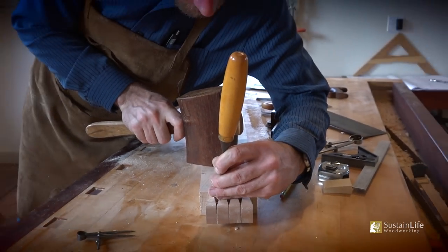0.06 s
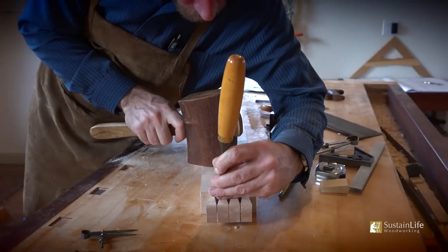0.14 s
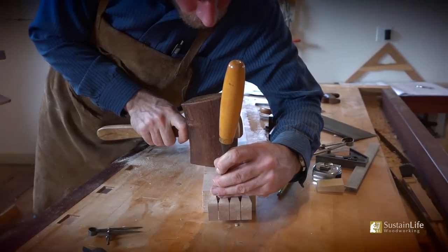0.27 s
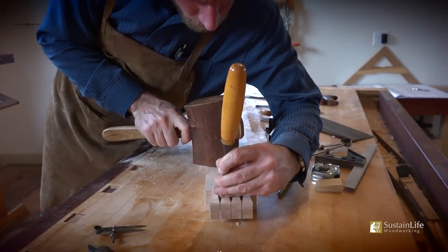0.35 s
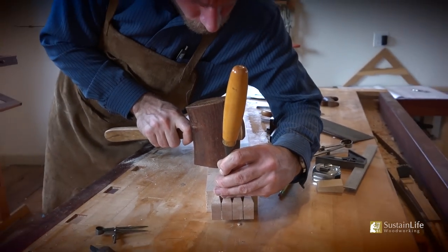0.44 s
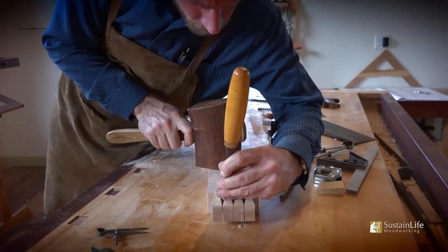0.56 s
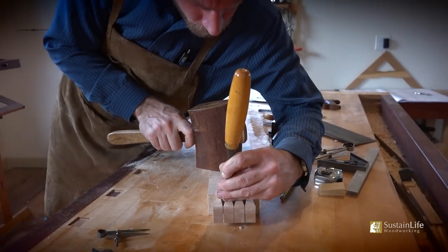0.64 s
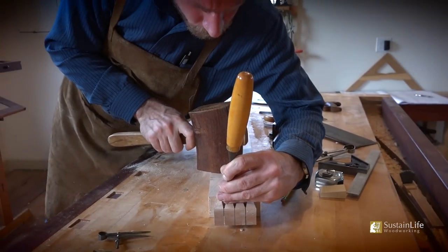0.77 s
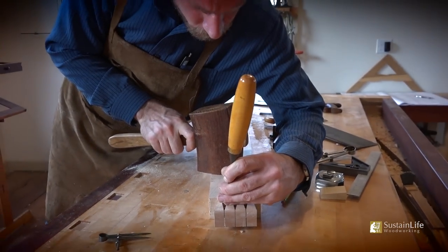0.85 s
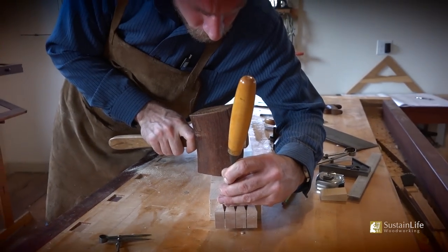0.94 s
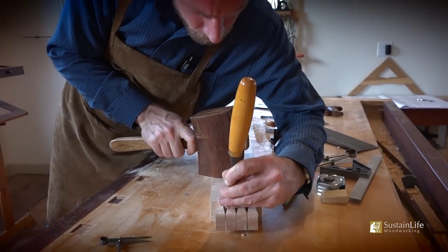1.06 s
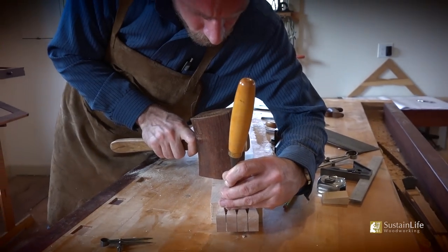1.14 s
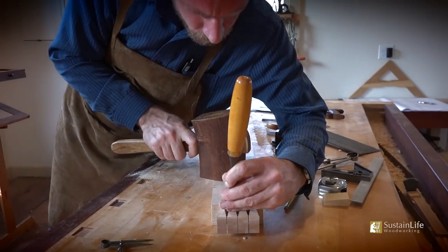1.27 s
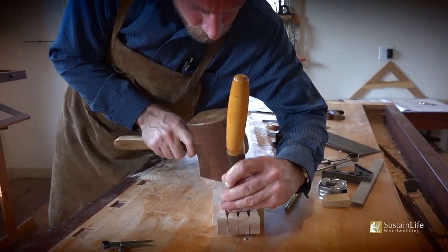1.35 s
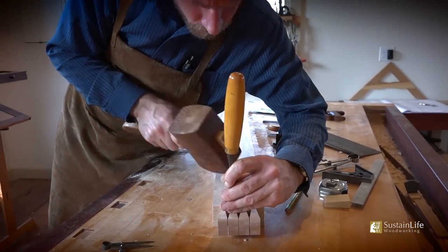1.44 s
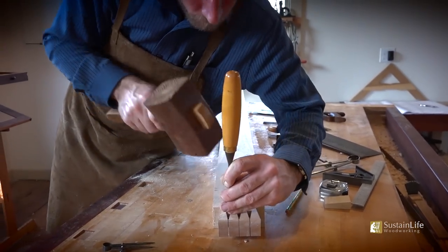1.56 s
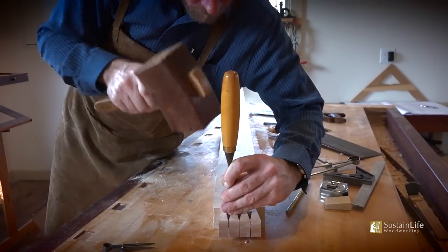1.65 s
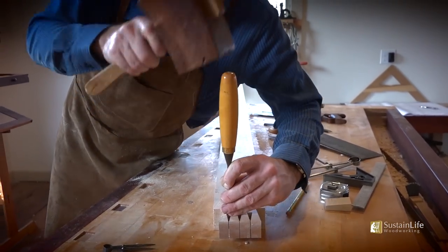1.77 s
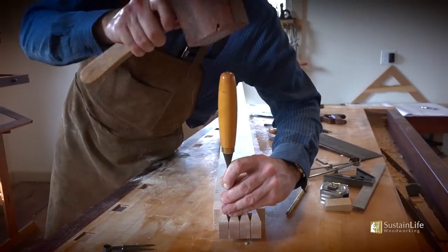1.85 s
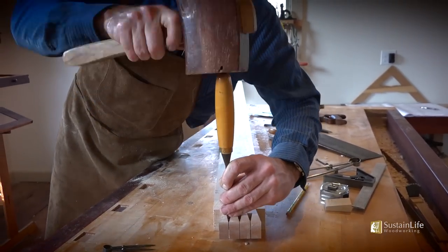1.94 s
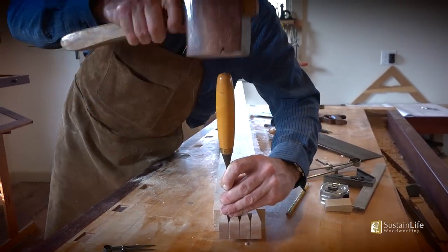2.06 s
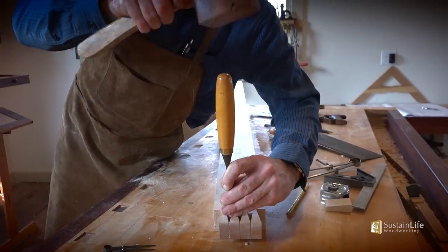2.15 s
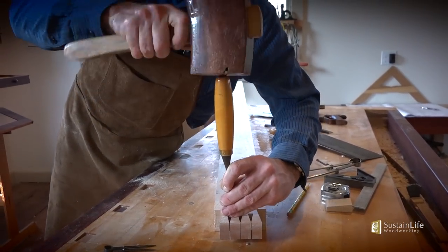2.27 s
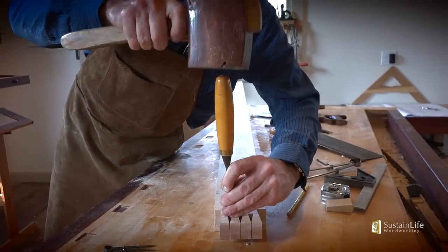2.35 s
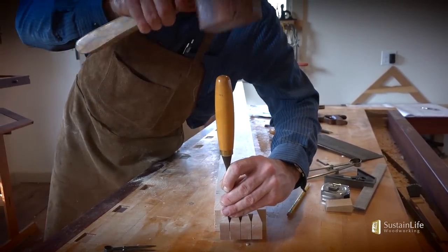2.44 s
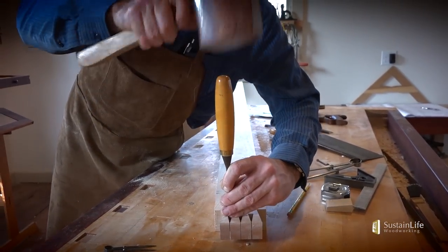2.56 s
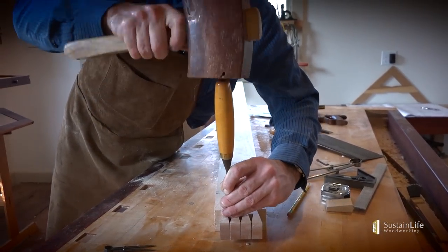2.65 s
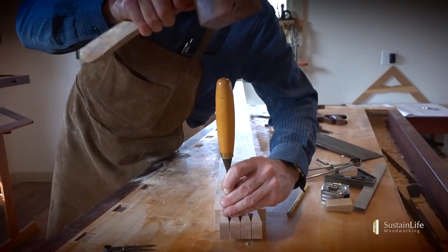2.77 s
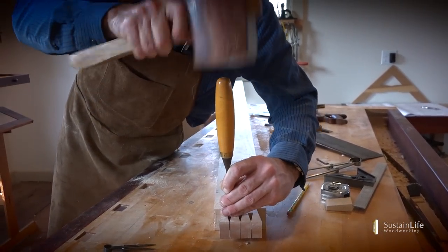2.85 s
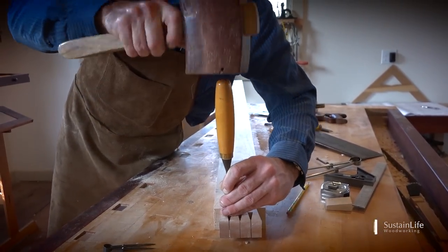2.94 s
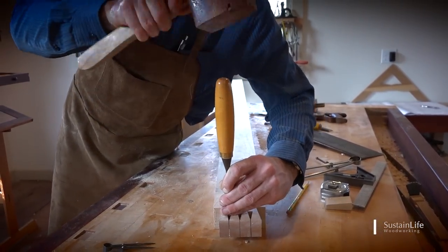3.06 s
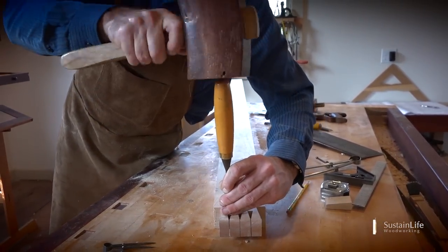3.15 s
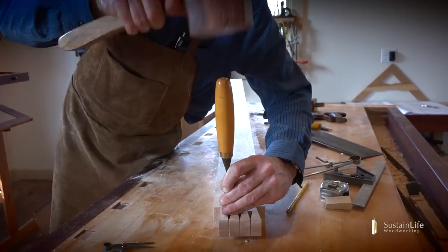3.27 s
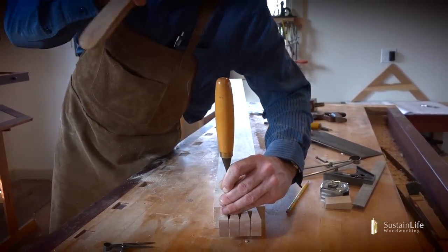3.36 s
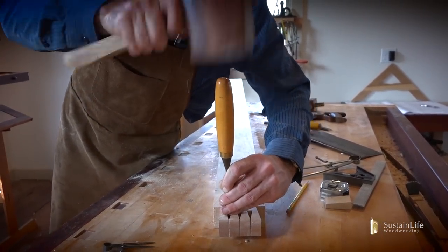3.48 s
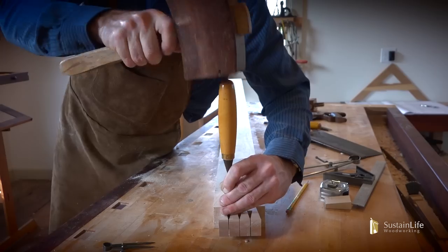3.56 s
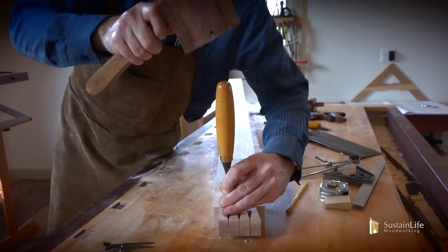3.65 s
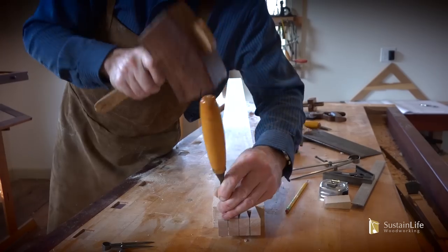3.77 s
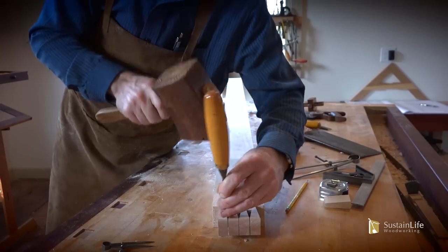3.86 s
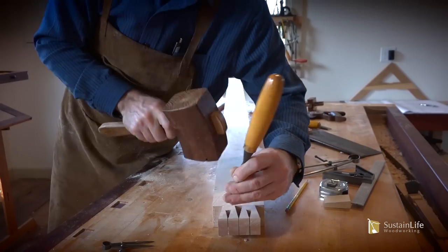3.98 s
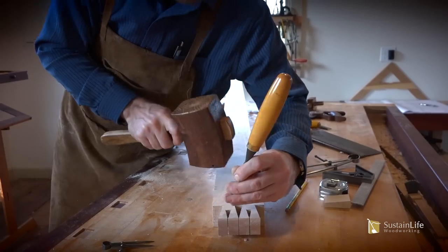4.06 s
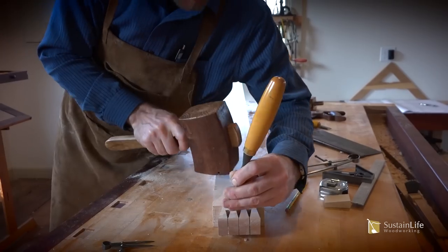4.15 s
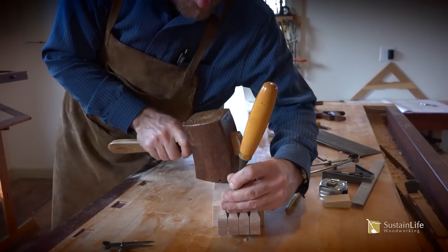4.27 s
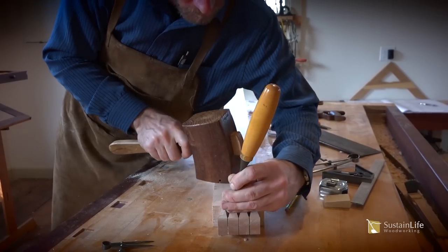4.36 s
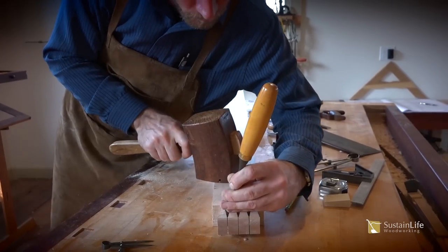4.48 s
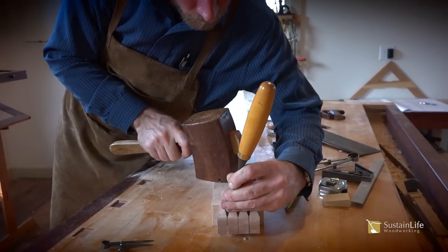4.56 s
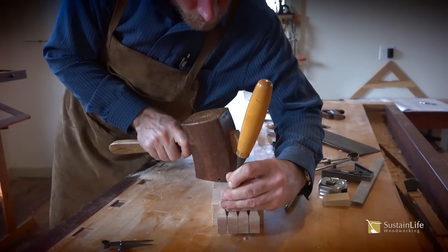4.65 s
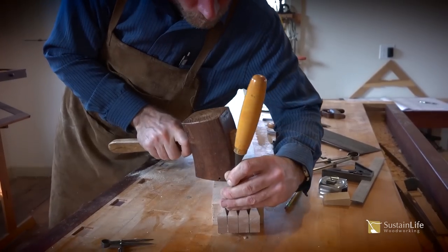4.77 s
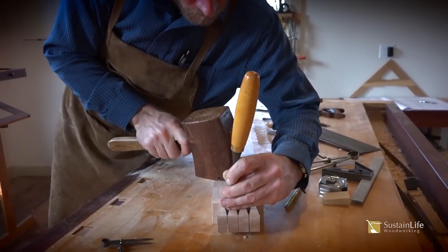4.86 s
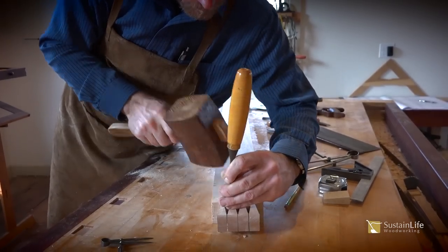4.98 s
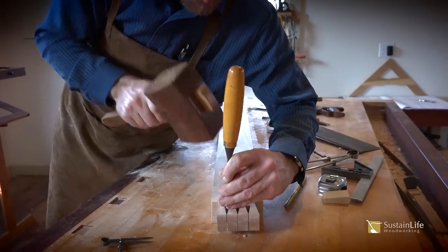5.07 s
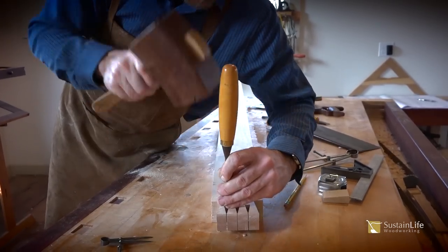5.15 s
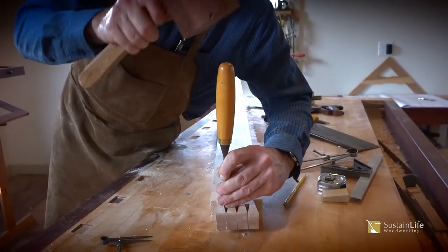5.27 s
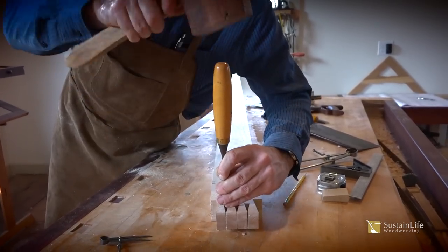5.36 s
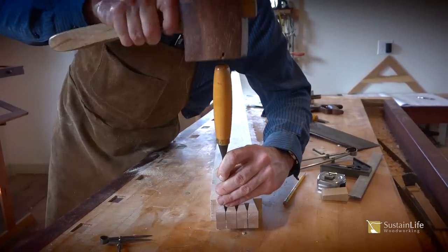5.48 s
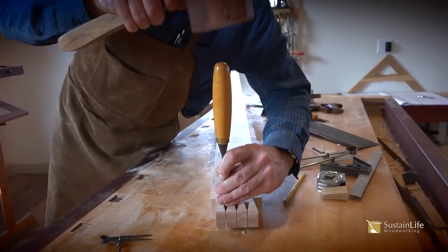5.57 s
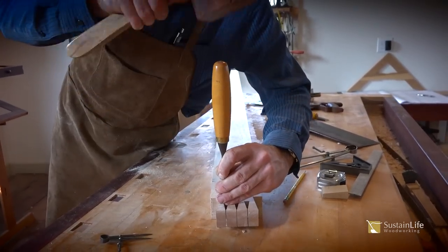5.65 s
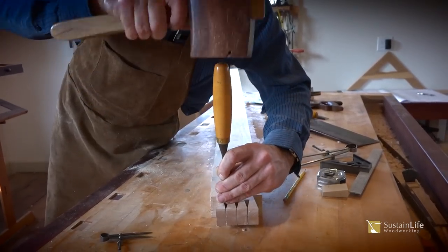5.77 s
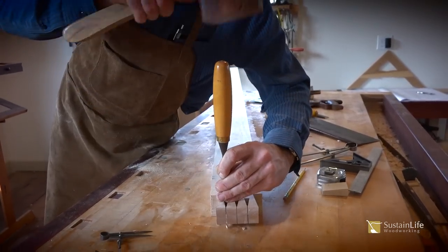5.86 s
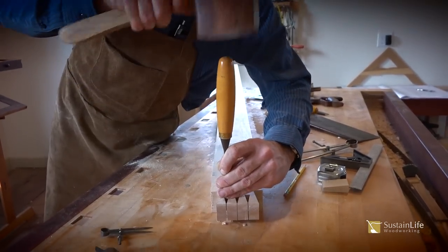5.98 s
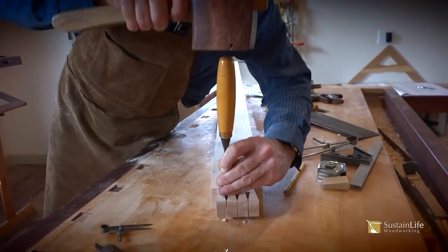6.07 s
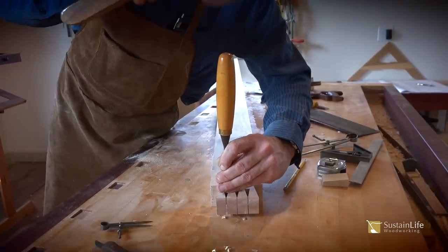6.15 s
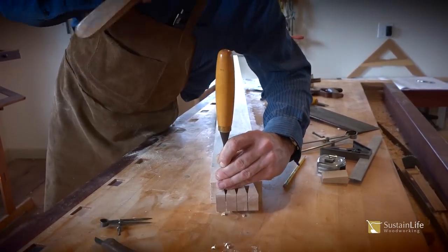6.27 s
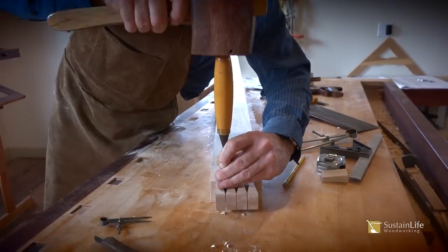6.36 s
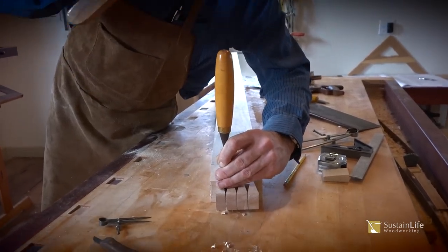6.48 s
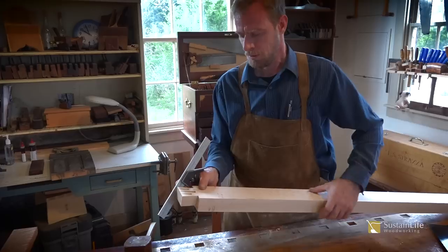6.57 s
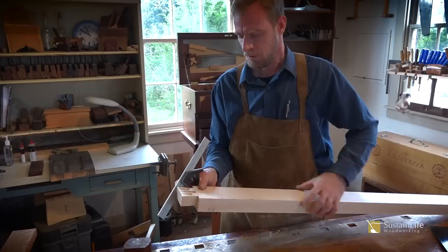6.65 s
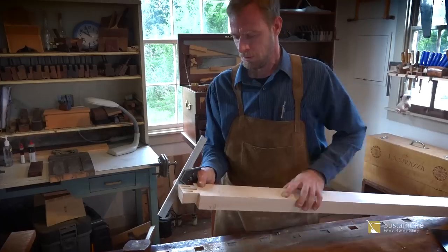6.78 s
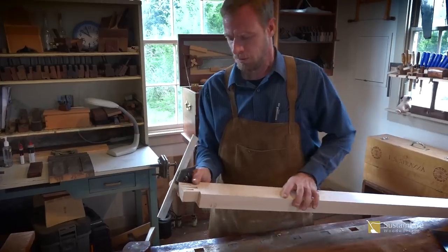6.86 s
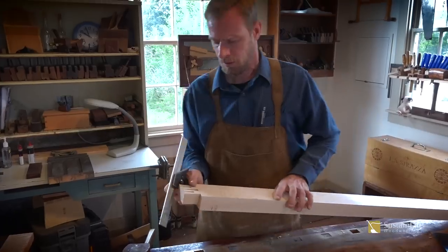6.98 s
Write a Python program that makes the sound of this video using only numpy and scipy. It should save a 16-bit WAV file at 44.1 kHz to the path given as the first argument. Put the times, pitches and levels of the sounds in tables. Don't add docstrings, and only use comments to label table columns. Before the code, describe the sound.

In a quiet, lively workshop with low room tone and a faint fan whine, a small bird whistles quick falling phrases while tools tick. Then six loud mallet blows drive a chisel into wood, about three per second. After a dull bump and a pause, lighter blows grow into four or so hard ones. The scene cuts abruptly to a louder room tone and soft thuds of a shifted board. Close microphone, blows flattened by limiting.

```python
import sys
import numpy as np
from scipy import signal
from scipy.io import wavfile
from scipy.ndimage import uniform_filter1d

SR = 44100
rng = np.random.default_rng(int(sys.argv[2]) if len(sys.argv) > 2 else 0)


def wav_record(signal):
    frames = np.transpose(np.atleast_2d(signal))
    bounded = np.clip(frames, -1, 1)
    quanta = np.round(bounded * 32767).astype(np.int16)
    wavfile.write(sys.argv[1], SR, quanta)


def boost(x):
    u = np.asarray(x, float) / 20
    return 10 ** u


N = 309582
CHANGE_S = 6.597


def evened(x):
    return x / np.sqrt(np.mean(x ** 2) + 1e-20)


def read(points, hz):
    f, value = np.transpose(points)
    return np.interp(np.log(hz + 1), np.log(f + 1), value)


def bell(hz, centre_hz, octaves):
    return np.exp(-(np.log2((hz + 1) / centre_hz) / octaves) ** 2)


def add(mix, s, sound):
    at = round(s * SR)
    sound = sound[..., max(-at, 0):]
    part = mix[..., max(at, 0):][..., :sound.shape[-1]]
    part += sound[..., :part.shape[-1]]


def noise(size, same, db_of, frame=1024, patchy_db=2.0):
    hop = frame // 4
    hz = np.fft.rfftfreq(frame, 1 / SR)[:, None]
    t = np.arange(size // hop + 5) * hop / SR
    a, b, c, d, patches = rng.standard_normal((len(t), len(hz), 5)).T
    patches = uniform_filter1d(patches, size=8, axis=0)
    patches = evened(uniform_filter1d(patches, size=10, axis=1))
    like = np.clip(read(same, hz), -1, 1)
    left = a + 1j * b
    right = like * left + np.sqrt(1 - like ** 2) * (c + 1j * d)
    z = np.array([left, right]) * boost(db_of(hz, t) + patchy_db * patches)
    return signal.istft(z, nperseg=frame, noverlap=frame - hop)[1][:, :size]


def coloured(x, db_of):
    size = x.shape[-1]
    log_gain = np.log(boost(db_of(abs(np.fft.fftfreq(size, 1 / SR)))) + 1e-5)
    response = np.exp(np.conj(signal.hilbert(log_gain)))
    return np.fft.ifft(np.fft.fft(x) * response).real


# f/Hz, t60/s
SHOP = [(60, 0.61), (160, 0.65), (420, 0.46), (1100, 0.49), (2900, 0.53), (7700, 0.45), (12000, 0.33),
        (16000, 0.36)]
# f/Hz, likeness [-1..1]
SAME_SHOP = [(60, 1), (250, 0.98), (1000, 0.99), (3000, 0.99), (5000, 1), (8000, 0.08), (12000, 0.4),
             (16000, 1)]


def room(stretch=1, swell_s=0.0051):
    tail = noise(SR, SAME_SHOP, lambda hz, t: -60 * t / (stretch * read(SHOP, hz)), frame=256, patchy_db=1.2)
    tail = tail * (1 - np.exp(-np.arange(SR) / SR / swell_s))
    return tail / np.linalg.norm(tail[0])


# f/Hz, level/dB per Hz
TONE = [(15, -40), (25, -8.5), (59, -1.5), (200, 0), (335, -10.5), (427, -7), (575, -11.5), (1040, -13.5),
        (2220, -25), (2990, -26.5), (5570, -29.5), (12200, -30.5), (16000, -38.5)]
# f/Hz, width/Hz, level/dB
DRONE = [(86.7, 21, -65), (174, 17, -61.5), (246, 11.5, -63.5), (1060, 110, -65.5)]
# f/Hz, level/dB
RUSTLE = [(500, -3), (1200, 12), (2500, 5.5), (5000, 2), (8000, -0.5), (16000, -72)]
# f/Hz, likeness [-1..1]
SAME_AIR = [(60, .97), (200, 0.92), (600, 0.84), (1600, 0.96), (4500, 0.99), (8000, 0.31), (11000, 0.57),
            (14000, .9)]
# t/s, level/dB
GAIN = [(0, -55.5), (1.95, -53.5), (2.3, -56.5), (4.2, -60), (4.7, -61.5), (5.6, -59.5), (6.59, -60)]
# t/s, level/dB
FAN = [(0, -67), (.6, -65.5), (1.4, -82), (2, -62), (4.7, -65), (5.1, -60.5), (6.59, -63), (7.02, -76)]
# start t/s, length/s, level/dB
RUSTLES = [
    (-.6, 2.26, -66),
    (1.45, 0.27, -67.5),
    (1.5, 0.71, -63),
    (4.85, 1.2, -67.5),
    (6.3, 0.93, -54),
]


def air(whine_hz=424, waver_hz=1.0, new_room_db=-52.5, settle_db=6, settle_s=0.16):
    t = np.arange(N) / SR
    after = t - CHANGE_S
    new_tone_db = new_room_db + settle_db * np.exp(-abs(after) / settle_s)
    tone_db = np.where(after < 0, np.interp(t, *np.transpose(GAIN)), new_tone_db)
    tone = evened(noise(N, SAME_AIR, lambda hz, t: read(TONE, hz), frame=2048))
    for hz0, width, db in DRONE:
        band = noise(N, SAME_AIR, lambda hz, t: -10 * np.log10(1 + (2 * (hz - hz0) / width) ** 4), frame=8192)
        tone = tone + boost(db + 54.0) * evened(band)
    moves = sum(boost(db) * np.sin(np.pi * np.clip((t - s) / length, 0, 1)) for s, length, db in RUSTLES)
    rustle = evened(noise(N, SAME_AIR, lambda hz, t: read(RUSTLE, hz), frame=256, patchy_db=2.5))
    waver = evened(uniform_filter1d(rng.standard_normal(N), size=6000))
    whine = np.sqrt(2) * np.sin(2 * np.pi * np.cumsum(whine_hz + waver_hz * waver) / SR)
    whine_db = np.interp(t, *np.transpose(FAN))
    return boost(tone_db) * tone + moves * rustle + boost(whine_db) * whine


# t/s into phrase, length/s, start f/Hz, end f/Hz, level/dB
SONG = [(0.004, 0.033, 6400, 5080, -56), (0.034, 0.03, 4000, 4100, -51), (0.058, .03, 3670, 3080, -51.5),
        (0.086, 0.032, 4010, 4710, -50.5), (0.145, 0.036, 3040, 2956, -41),
        (0.199, 0.024, 2910, 2680, -45.5), (0.251, 0.028, 3230, 3610, -45.5),
        (0.317, .035, 2690, 2076, -44.5), (0.342, 0.049, 2090, 2037, -55), (0.41, 0.055, 2060, 2030, -49),
        (0.477, 0.039, 2046, 2022, -51)]
# t/s, level/dB, last note level/dB
PHRASES = [
    (-.135, -3.5, 4),
    (0.367, -0.5, 0),
    (0.874, -0.5, -1.5),
]


def bird(wet_db=2.5):
    mix = np.zeros(N + SR)
    for start, phrase_db, last_db in PHRASES:
        for s, length, from_hz, to_hz, db in SONG:
            u = np.arange(0, 1, 1 / (SR * length))
            hz = to_hz + (from_hz - to_hz) * (1 - u) ** 1.65
            note = np.sin(2 * np.pi * np.cumsum(hz) / SR) * signal.windows.tukey(len(u), 0.6)
            note_db = db - 1.7 + phrase_db + last_db * (s == SONG[-1][0])
            add(mix, 1 + start + s, boost(note_db) * note)
    wet = signal.fftconvolve(mix[None], room(stretch=0.85), axes=1)[:, :N + SR]
    return (mix + boost(wet_db) * wet)[:, SR:]


def taps(rows, spread_octaves, rise_cycles, wet_db=-5):
    mix = np.zeros(N)
    t = np.arange(SR // 4) / SR
    for s, db, hz0, t60 in rows:
        grain = coloured(rng.standard_normal(len(t)),
                         lambda hz: -6 * (np.log2((hz + 1) / hz0) / spread_octaves) ** 2)
        rise = np.sin(np.pi / 2 * np.minimum(t * hz0 / rise_cycles, 1)) ** 2
        add(mix, s, boost(db - 60 * t / t60) * rise * evened(grain))
    return mix + boost(wet_db) * signal.fftconvolve(mix[None], room(), axes=1)[:, :N]


# t/s, level/dB, f/Hz, t60/s
TICKS = [
    (.508, -39, 2380, 0.011),
    (.878, -51, 3930, 0.0082),
    (.900, -37.5, 2190, 0.011),
    (1.104, -55, 1496, 0.01),
    (1.515, -50, 4340, 0.036),
    (1.58, -62, 5500, .03),
    (4.446, -64, 5480, .015),
    (4.518, -61.5, 5340, .025),
    (5.5108, -32.5, 6080, 0.033),
    (5.804, -30, 4200, 0.017),
]


def ticks():
    return taps(TICKS, spread_octaves=0.9, rise_cycles=0.47)


# t/s, level/dB, f/Hz, t60/s
BUMPS = [(.04, -61, 150, .15), (.528, -60, 200, 0.12), (1.038, -65, 178, 0.13), (4.333, -22.5, 340, 0.054),
         (4.334, -31.5, 1000, .035), (5.511, -21.5, 452, 0.044), (5.511, -25, 1000, 0.017),
         (5.804, -20, 910, .02), (6.704, -34.5, 227, 0.058), (6.714, -30, 87.5, 0.093),
         (6.755, -36, 100.2, 0.074), (6.735, -40.5, 400, 0.1), (6.81, -57, 130, .1)]


def bumps():
    return taps(BUMPS, spread_octaves=0.67, rise_cycles=0.56)


def resonances(ring, hz, shares=(0.08, 0.08, 0.17), ripple_db=5.5):
    *pitches, lift_db, fizz_db = ring
    lifts = sum(1.64 * lift_db * np.exp(-((hz - f) / (share * f)) ** 2) for f, share in zip(pitches, shares))
    bands = np.interp(hz, np.arange(80) * 280, rng.standard_normal(80))
    ripple = ripple_db * bands * np.clip(hz / 4000 - 1, 0, 1)
    return lifts + fizz_db * bell(hz, 12000, 0.92) + ripple


# f/Hz, level/dB, t60/s
BENCH = [(78, 0, 0.39), (103, -11, 0.28), (122.4, -3.5, 0.2), (178, -1.5, 0.54), (208, -2, 0.27),
         (273.6, 0.5, 0.55), (262.3, 9.5, 0.22), (317, 0.5, 0.15), (382, -14.5, 0.3), (475, 4, 0.24),
         (594, 2, 0.2), (687, -19, 1), (708, -1, 0.34)]


def bench_ring(t):
    spread_db, phase = rng.uniform(-1.11, 1, (2, len(BENCH)))
    ring = np.zeros(len(t))
    for (hz, level, t60), d, p in zip(BENCH, spread_db, phase):
        mode = boost(level + 1.3 * d - 60 * t / t60) * np.sin(2 * np.pi * hz * t + 1.4 * p)
        ring += mode * (1 - np.exp(-t * hz * 1.5))
    return ring


# f/Hz, level/dB
CRACK = [(35, -37.5), (60, -11.5), (90, -5.5), (240, -4.5), (450, 1), (750, -1), (1700, -3), (2300, -10.5),
         (3200, -15), (4000, -22), (7500, -31), (10000, -40), (12500, -40), (16000, -51)]
# f/Hz, left-right level/dB
LEAN = [(40, -3.5), (80, -3.5), (150, 0), (1000, 0), (10000, -0.3)]
TILT_OCTAVES = (-.3, 2.5)


def blow(tool, s, db, hardness_db, thump_db, boom_db, over_db=43, ring_db=-52, direct_db=-14.5,
         early_db=-52, click_db=0.0, crack_db=-27):
    t = np.arange(SR) / SR
    lead = round(0.024 * SR)
    heard = np.pad(room(), ((0, 0), (lead, 0)))
    heard[:, :lead] += boost(early_db) * rng.standard_normal(lead) * np.linspace(0, 1, lead) ** 1.4
    push = -boost(direct_db) * (np.arange(lead + SR) == lead)
    push[lead:] += boost(crack_db - 60 * t / 0.014) * rng.standard_normal(SR)
    heard += coloured(push, lambda hz: click_db * np.log2(1 + hz / 2000))
    heard = coloured(heard, lambda hz: read(CRACK, hz))
    heard[:, lead:] += boost(ring_db) * bench_ring(t)
    sides = np.array([[0.5], [-0.5]])

    def colour_db(hz):
        tilt = hardness_db * np.clip(np.log2((hz + 1) / 500), *TILT_OCTAVES)
        bench = thump_db * bell(hz, 85.2, 0.644) + boom_db * bell(hz, 178, 0.44)
        return tilt + bench + resonances(tool, hz) + sides * read(LEAN, hz)

    return s + 0.001 - lead / SR, boost(db + over_db) * coloured(heard, colour_db)


# t/s, level/dB, hardness/dB per octave, bench thump/dB, bench top boom/dB
BLOWS = [(2.024, -12.5, -2, 4, 5), (2.356, -11, 1, 1.5, -3), (2.678, -14, 2, 5, -2.5),
         (2.958, -10, 0, 2, 8), (3.228, -8.5, 1.57, -2.5, 4), (3.584, -11, 1.15, -4, 0.8),
         (4.332, -33.5, -8, 5.5, 6.5), (5.51, -25.5, -1.37, -1, 1), (5.803, -19, -0.36, 5.5, -2),
         (6.093, -13.5, -0.9, 2.5, -4), (6.417, -11, -0.13, -7, -1.5)]
# mallet f/Hz, handle f/Hz, blade f/Hz, lift/dB, fibre fizz/dB
RINGS = [(400, 910, 1350, 2.5, 3), (1000, 1256, 2950, 4.5, 2), (950, 2150, 2950, 3, 0.6),
         (1460, 2300, 5000, 2.5, -4), (1700, 2250, 4500, 5, -4.5), (1773, 2290, 4300, 3.5, -1),
         (271, 1470, 2750, 4.5, -1), (272, 2560, 790, 4, 6), (600, 2800, 990, 3.5, -1),
         (920, 2230, 3900, 3.5, 7), (1000, 1470, 3460, 2.5, -1)]


def chiselling():
    mix = np.zeros((2, N))
    for tool, row in zip(RINGS, BLOWS):
        add(mix, *blow(tool, *row))
    return mix * np.clip((CHANGE_S - np.arange(N) / SR) / 0.00067, 0, 1)


def scene():
    return air() + bird() + ticks() + bumps() + chiselling()


def low_pass(x):
    return signal.sosfilt(signal.butter(12, 16510, fs=SR, output="sos"), x)


def record(dry, knee_db=-20, ratio=3.13, release_db_per_s=500):
    power_db = 10 * np.log10(abs(uniform_filter1d((dry ** 2).mean(0), size=300)) + 1e-12)
    fall_db = np.arange(N) * release_db_per_s / SR
    held_db = np.maximum.accumulate(power_db + fall_db) - fall_db
    over_db = np.maximum(held_db - knee_db, 0)
    limited = dry / boost((1 - 1 / ratio) * uniform_filter1d(over_db, size=150))
    clipped = 0.7 * np.tanh(limited / 0.52)
    lowpass = signal.firwin(255, 15750, window=("kaiser", 9), fs=SR)
    mix = signal.oaconvolve(clipped, lowpass[None], "same")
    return low_pass(mix)


dry = scene()
out = record(dry)
wav_record(out)
```